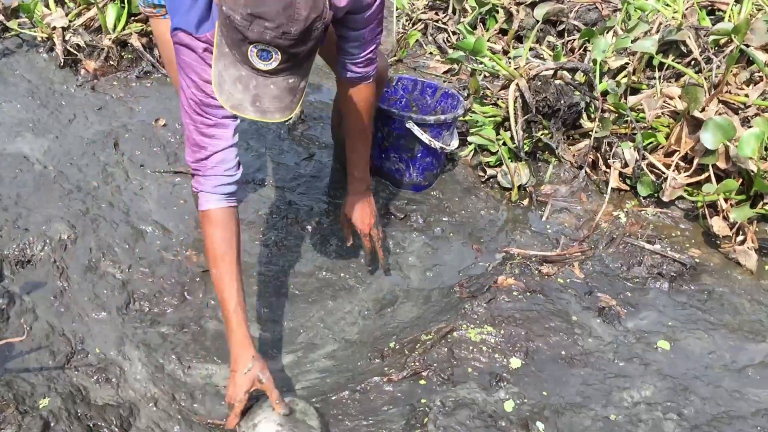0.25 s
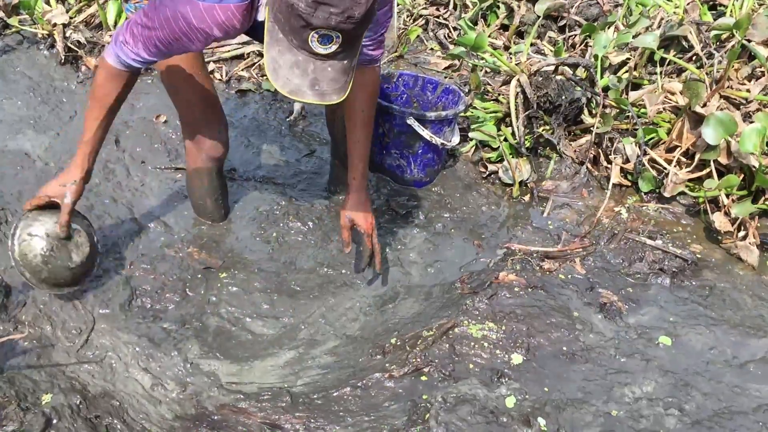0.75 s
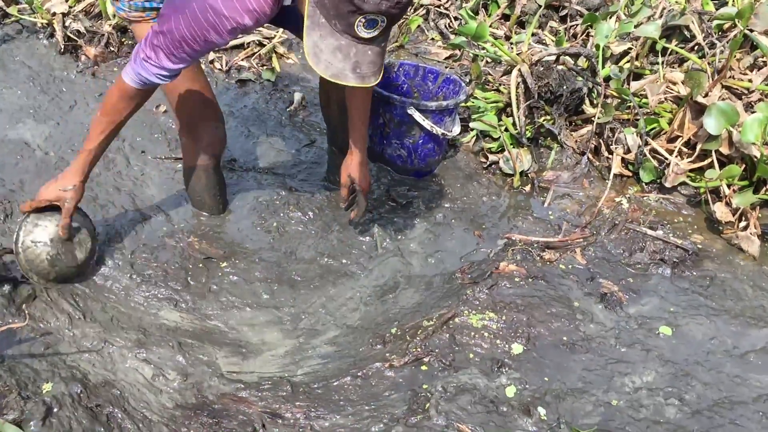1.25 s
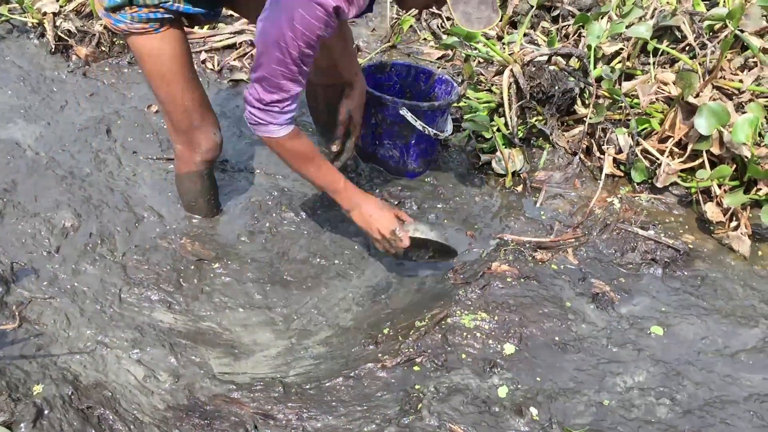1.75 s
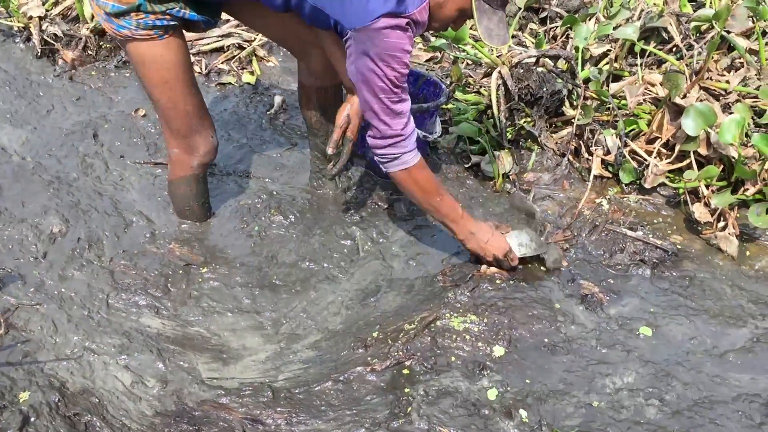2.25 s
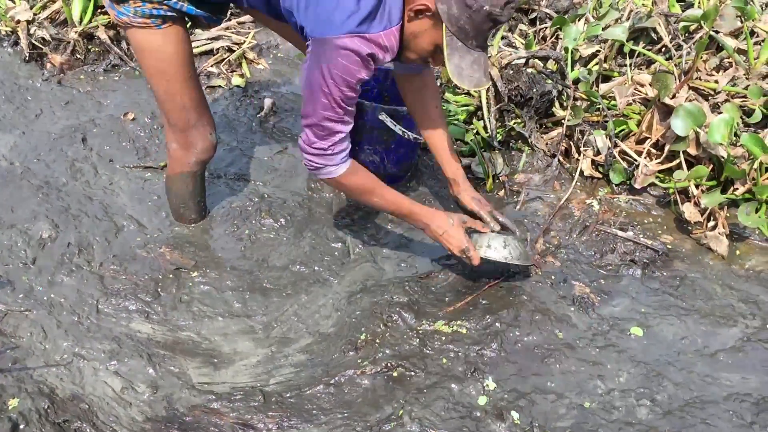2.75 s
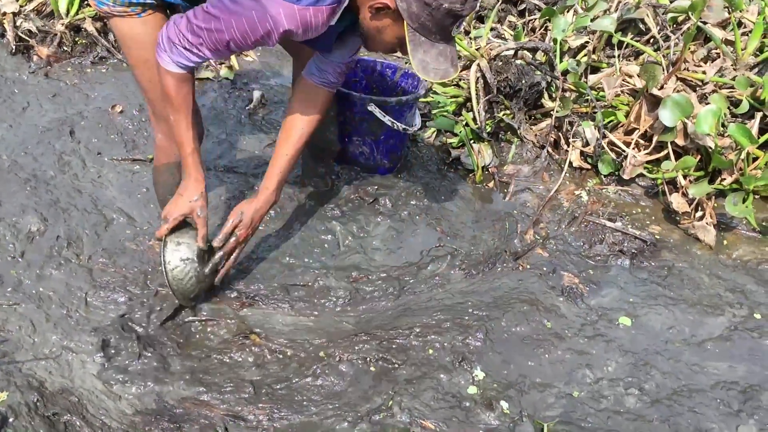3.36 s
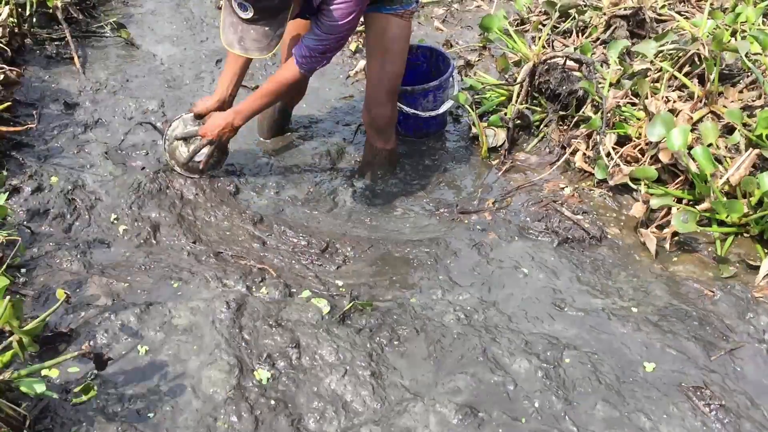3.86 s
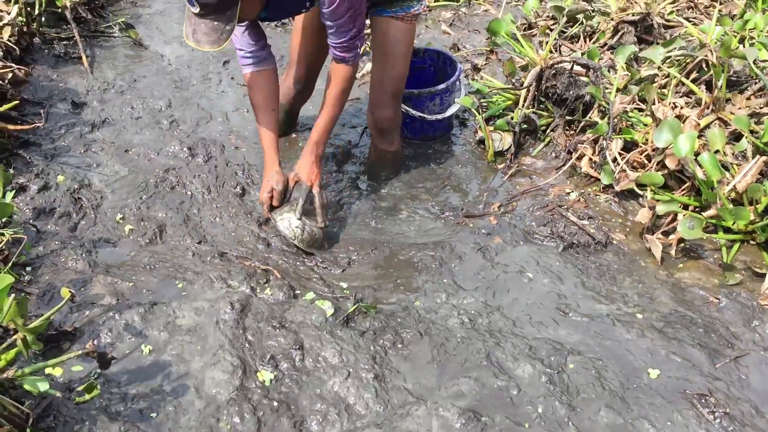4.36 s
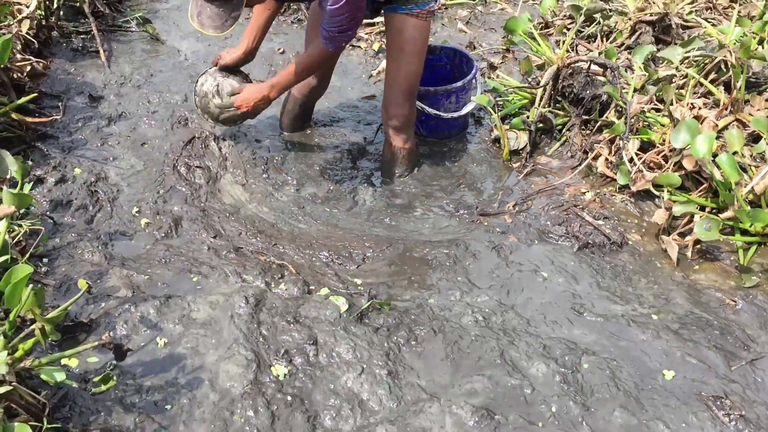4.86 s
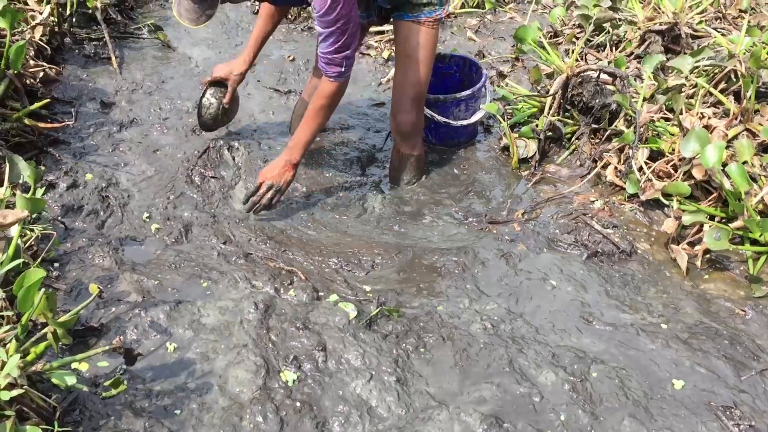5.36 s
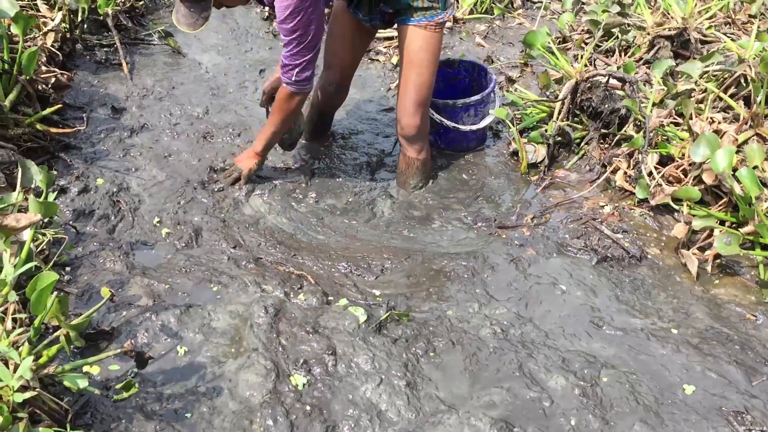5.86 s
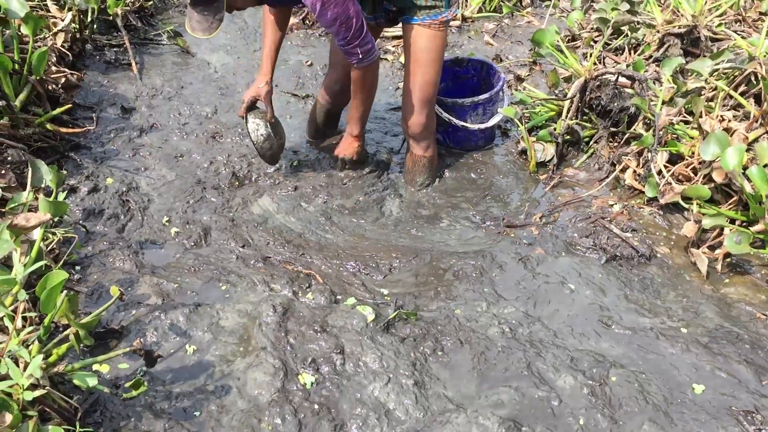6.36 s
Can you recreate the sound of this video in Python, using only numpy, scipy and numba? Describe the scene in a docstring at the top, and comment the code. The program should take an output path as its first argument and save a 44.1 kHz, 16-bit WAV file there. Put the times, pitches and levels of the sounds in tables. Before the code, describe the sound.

A hand and a metal bowl scoop through shallow muddy water a couple of metres away in the open. Short, irregular splashes come one after another, with wet slaps, fine spray and small rising bubbles, then thin out after one sharp slap near the end. Wind rumbles and thumps softly on the microphone, mostly at the start. Small birds chirp faintly in the distance over a soft hiss.

```python
"""Scooping shallow muddy water

A hand and a metal bowl scoop through the water, a couple of metres away in the open.
Trapped air rings as short rising bubbles; thrown water slaps and sprays. Wind buffets the microphone
and small birds call from the reeds over a faint field hiss. The sound drops out once for a moment."""
import sys
import numpy as np
from scipy import signal
from scipy.fft import rfft, irfft
from scipy.io import wavfile
from scipy.ndimage import uniform_filter1d
from numba import njit

SR = 44100
rng = np.random.default_rng(int(sys.argv[2]) if len(sys.argv) > 2 else 0)


def persist_wave(psi):
    """Save psi, clipped to +-1, as 16-bit WAV."""
    counts = np.round(np.clip(psi, -1, 1) * 32767).astype(np.int16)
    wavfile.write(sys.argv[1], SR, np.atleast_2d(counts).T)


N = 291501
TIME = np.arange(N) / SR


def undb(db):
    return 10 ** (np.asarray(db) / 20)


def level(x, db):
    """Sets the RMS level."""
    return x * undb(db) / np.sqrt(np.mean(x ** 2))


def band(x, lo_hz, hi_hz, order=2):
    """Butterworth band-pass."""
    sos = signal.butter(order, [lo_hz, min(hi_hz, .45 * SR)], "band", fs=SR, output="sos")
    return signal.sosfilt(sos, x)


def colour(x, eq):
    """EQ through (freq_hz, gain_db) points."""
    hz, db = np.transpose(eq)
    bin_hz = np.arange(N // 2 + 1) * SR / N + 1
    return irfft(rfft(x) * undb(np.interp(np.log(bin_hz), np.log(hz), db)), N)


def wander(rate_hz):
    """Smooth random modulation with a spread near 1."""
    hold = int(SR / rate_hz)
    steps = np.repeat(rng.standard_normal(N // hold + 1), hold)
    return 1.3 * uniform_filter1d(uniform_filter1d(steps, hold), hold)[:N]


def fader_db(points):
    """Level ride through (time_s, level_db) points, silent outside them."""
    time_s, db = np.transpose(points)
    return np.interp(TIME, time_s, db, left=-120, right=-120)


def echo(x, t60_s):
    """Diffuse reverb tail of unit energy, wet only."""
    t = TIME[:int(t60_s * SR)]
    tail = rng.standard_normal(SR)[:len(t)] * 1000 ** (-t / t60_s)
    return signal.fftconvolve(x, tail / np.sqrt(np.sum(tail ** 2)))[:N]


@njit
def ring(start_s, hz, peak, rise_s, t60_s, octaves_per_s):
    """Gliding sines that each swell, pass through hz at their peak and die away."""
    out = np.zeros(N)
    for e in range(len(start_s)):
        start, phase = int(start_s[e] * SR), 0.
        for i in range(min(int((rise_s[e] + t60_s[e]) * SR), N - start)):
            t = i / SR - rise_s[e]
            phase += 2 * np.pi * min(hz[e] * 2 ** (octaves_per_s[e] * t), .45 * SR) / SR
            envelope = np.sin(.5 * np.pi * i / SR / rise_s[e]) if t < 0 else 1000 ** (-t / t60_s[e])
            out[start + i] += peak[e] * envelope * np.sin(phase)
    return out


def swarm(count, lo_hz, hi_hz, cycles, spread_db, glide_oct):
    """A cloud of short random rings at unit RMS: many quiet, a few loud."""
    when, pitch, size, length = rng.random((count, 4)).T
    hz = lo_hz * (hi_hz / lo_hz) ** pitch
    t60_s = cycles * (.66 + length) / hz
    peak = undb(-spread_db * np.log(1 - .99 * size))
    return level(ring(when * TIME[-1], hz, peak, .82 / hz, t60_s, glide_oct / t60_s), 0)


# Tone of the background bed: freq_hz, gain_db
FIELD_EQ = [(150, -18), (300, -7), (500, -3), (1000, -0.5), (2500, -9), (4500, -16), (5500, -12),
            (9000, -17), (16500, -20)]


def field():
    """Distant hiss of leaves and far birds, drifting gently in level."""
    return level(colour(rng.standard_normal(N), FIELD_EQ), -66) * undb(wander(1.775))


# Assorted bird notes: start_s, length_s, from_hz, to_hz, level_db
BIRD_NOTES = [(.312, .25, 4270, 4480, -71), (0.114, 0.082, 2970, 2700, -63), (0.797, .14, 4330, 4310, -65),
              (1.113, 0.11, 2900, 2710, -66), (1.339, 0.039, 2770, 2775, -60),
              (1.826, .064, 2780, 2730, -61), (2.09, 0.048, 2770, 2790, -67),
              (4.182, 0.094, 3220, 2930, -66.5), (4.356, 0.095, 3470, 4320, -65.5),
              (4.415, 0.066, 1880, 1794, -51), (4.463, 0.062, 4070, 5080, -62.5),
              (4.93, 0.057, 2710, 2620, -58.5), (4.976, .072, 5150, 5240, -60),
              (5.008, .046, 2105, 1780, -60), (5.021, 0.05, 4830, 4000, -61),
              (5.24, 0.069, 2430, 2285, -61), (5.251, 0.059, 4700, 4320, -62),
              (5.269, 0.15, 1786, 1928, -61), (5.427, 0.125, 1750, 1595, -66),
              (5.473, .078, 2596, 2425, -65), (5.772, 0.064, 3480, 2980, -59),
              (6.082, 0.057, 2555, 2427, -57), (6.171, 0.039, 2080, 1830, -53.5),
              (6.208, 0.056, 5430, 4150, -62.5), (6.39, 0.033, 3800, 3250, -60),
              (6.438, 0.06, 3620, 3670, -62.5), (6.496, 0.115, 680, 791, -57)]
# One bird's repeated falling chirp: start_s, level_db
CHIRPS = [(.213, -59.5), (1.005, -55), (1.867, -53.5), (2.326, -54), (2.884, -55)]
CHIRP_S, CHIRP_FROM_HZ, CHIRP_TO_HZ = .0388, 4200, 3380
# Level ride of the far flock: time_s, level_db
CHATTER_RIDE = [(0, -67), (4, -74.5), (4.4, -62), (5.1, -68.5), (5.5, -59.5), (5.65, -67.5), (5.85, -62.5),
                (6.1, -82), (6.45, -67), (6.61, -71)]


def birds():
    """Wavering whistles that bend most at the start, heard largely through echoes off the reeds."""
    notes = np.zeros(N)
    waver = 1 + .022 * wander(70)
    chirps = [(start_s, CHIRP_S, CHIRP_FROM_HZ, CHIRP_TO_HZ, db) for start_s, db in CHIRPS]
    for start_s, length_s, from_hz, to_hz, db in BIRD_NOTES + chirps:
        start = int(start_s * SR)
        progress = np.arange(min(int(length_s * SR), N - start)) / (length_s * SR)
        span = slice(start, start + len(progress))
        hz = (to_hz + (from_hz - to_hz) * (1 - progress) ** 1.9) * waver[span]
        envelope = undb(db) * np.sin(np.pi * progress) ** .5
        notes[span] += envelope * np.sin(2 * np.pi * np.cumsum(hz) / SR)
    chatter = swarm(count=700, lo_hz=1600, hi_hz=5000, cycles=130, spread_db=2.5, glide_oct=-.4)
    chatter *= undb(fader_db(CHATTER_RIDE))
    notes *= undb(3.5 * wander(110))  # burred and broken
    far = echo(notes + chatter, t60_s=.37) * undb(2 * wander(40))  # the reeds sway
    return notes + undb(3) * far


# Level ride of the rumble: time_s, level_db
WIND_RIDE = [(0, -51), (.8, -46.5), (1, -57), (1.7, -52.5), (2, -57), (3, -57), (4.3, -56.5), (4.6, -53),
             (4.8, -55.5), (5, -55), (5.4, -56.5), (6.1, -53), (6.61, -55.5)]
# Single eddies that punch through it: start_s, pitch_hz, peak_db
THUMPS = [(.005, 97, -38), (.037, 90, -29), (.06, 104, -35.5), (0.11, 113, -39.5), (.159, 99, -40),
          (0.219, 77, -30.5), (0.299, 89.5, -37.5), (0.37, 126, -30.5), (.426, 140, -42), (.462, 93, -31),
          (0.572, 105, -37), (0.615, 73.5, -44), (0.686, 112, -36), (0.732, 71.5, -38.5), (0.804, 130, -29),
          (.983, 101, -42), (1.042, 80, -36.5), (1.123, 82, -41), (1.198, 61.6, -44.5), (1.308, 93, -38.5),
          (1.634, 72, -38), (1.686, 64, -42), (2.154, 85, -39), (2.798, 99.4, -43), (3.042, 83, -44.5),
          (4.566, 73, -41.5), (4.934, 71.6, -38), (4.99, 65, -39.5), (5.829, 86.4, -42), (5.875, 77, -45.5),
          (6.021, 93, -43), (6.198, 92, -41.5)]


def wind():
    """Eddies buffet the microphone: a puffing rumble, and sagging thumps with a short, higher edge."""
    puffs = undb(3.9 * wander(22)) * rng.standard_normal(N)
    rumble = level(band(puffs, 40, 119.6, order=3), 0) + level(band(puffs, 120, 276), -10.5)
    start_s, hz, db = np.transpose(THUMPS)
    rise_s = .86 / hz
    falling = np.full(len(hz), -1.)
    thumps = ring(start_s, hz, undb(db), rise_s, t60_s=6 / hz, octaves_per_s=25 * falling)
    edges = ring(start_s + rise_s / 2, 2.25 * hz, undb(db - 11),
                 rise_s=.42 / hz, t60_s=2.8 / hz, octaves_per_s=30 * falling)
    return undb(fader_db(WIND_RIDE)) * rumble + thumps + edges


def drips():
    """Stray drops: faint, high pings."""
    return undb(-76.5) * swarm(count=70, lo_hz=4500, hi_hz=12000, cycles=28, spread_db=3, glide_oct=.2)


# Fizz level rides, one list per splash: time_s, level_db
SPLASH_RIDES = [
    [(0, -51), (.048, -77), (.14, -65)],
    [(.299, -80), (.378, -52.5), (.498, -50.5), (.555, -42.5), (.797, -53.5), (.88, -64)],
    [(1.189, -80), (1.246, -46), (1.305, -58.5), (1.345, -57), (1.37, -73)],
    [(1.41, -62), (1.447, -58), (1.59, -55), (1.659, -66.5)],
    [(2.139, -79), (2.165, -54), (2.216, -70), (2.267, -50), (2.317, -72), (2.396, -48.5), (2.488, -46.5),
     (2.704, -54), (2.8, -76.5)],
    [(3.039, -68), (3.079, -51.5), (3.197, -53), (3.277, -46), (3.448, -47.5), (3.471, -40), (3.572, -62),
     (3.601, -47), (3.645, -68.5), (3.685, -63)],
    [(3.735, -51), (3.865, -43.5), (3.973, -59), (3.993, -63.5), (4.033, -44), (4.063, -59), (4.17, -64.5)],
    [(4.47, -63), (4.563, -61), (4.649, -60), (4.735, -46.5), (4.808, -62.5), (4.876, -62.5),
     (4.913, -48.5), (4.97, -73)],
    [(5.119, -79), (5.152, -64), (5.259, -77)],
    [(5.559, -57), (5.587, -37.5), (5.629, -62)],
    [(5.999, -93), (6.027, -50), (6.049, -71)],
]
# Layer trims against the fizz, one row per splash: spray_db, gurgle_db
SPLASH_MIX = [(-9, 10.5), (-8, 0.5), (-7.5, 11), (-5.5, -12), (-7, -3.5), (-9.5, -2), (-10.5, -3),
              (-11, 4.5), (-3.5, -8), (-13, -1), (-9.5, -15)]
# Tone of the fizz: freq_hz, gain_db
FIZZ_EQ = [(500, 2.5), (1000, -12), (2000, -4), (4000, 0), (7000, -9), (11000, -46)]
GURGLE_PIVOT_DB, GURGLE_SLOPE = -49, 1.5  # harder stirring lifts the gurgle faster than the fizz


def stirring():
    """Churned water: small bubbles fizz and droplets spray in shared patches, over low gurgles."""
    rides_db = np.array([fader_db(splash) for splash in SPLASH_RIDES])
    spray_trim_db, gurgle_trim_db = np.transpose(SPLASH_MIX)[..., None]
    fizz_db = rides_db.max(axis=0)
    spray_db = (rides_db + spray_trim_db).max(axis=0)
    expanded_db = GURGLE_PIVOT_DB + GURGLE_SLOPE * (rides_db - GURGLE_PIVOT_DB)
    gurgle_db = (expanded_db + gurgle_trim_db).max(axis=0)
    patches = undb(3 * wander(70))
    fizz = swarm(count=5000, lo_hz=1000, hi_hz=8000, cycles=28, spread_db=3.5, glide_oct=.3)
    fizz = undb(fizz_db) * level(colour(fizz + .3 * rng.standard_normal(N), FIZZ_EQ), 0)
    spray = swarm(count=5000, lo_hz=6000, hi_hz=16000, cycles=10, spread_db=4, glide_oct=.1)
    spray += .83 * level(band(rng.standard_normal(N), 4000, 17300), 0)
    gurgle = swarm(count=1300, lo_hz=492, hi_hz=1966, cycles=32, spread_db=3.5, glide_oct=.87)
    gurgle = undb(gurgle_db - 6.5) * band(gurgle, 380, 4000)
    spray *= undb(spray_db + 2.1 * wander(160))
    return patches * (fizz + spray) + gurgle


# Slap hits: peak_s, top_db, body_vs_top_db, t60_ms
SLAPS = [(0.028, -43, -30, 26), (.456, -37, -20, 23), (0.554, -26, 1.5, 31), (0.615, -23.5, -23, 14),
         (0.6268, -43, 15.5, 21), (.6973, -30, -17, 14), (1.2453, -37.5, -10, 37.5), (1.328, -40, -18, 25),
         (1.4393, -31, -27, 11), (1.457, -41.5, 1, 11), (1.495, -37, -9, 27), (1.519, -41, -1.5, 8),
         (1.5535, -37, -15, 23), (1.5685, -32, -24, 17), (1.5954, -21.5, -1.5, 5.6),
         (1.609, -25.5, -33, 5.4), (1.6286, -34.5, 0, 15), (2.399, -36, 1, 13), (2.4614, -50, -6, 15),
         (2.48, -37, 1, 68), (2.4983, -46, -3, 30), (2.546, -43, 1, 96), (2.633, -39, -2, 33),
         (2.701, -44, 9, 5.6), (2.7274, -43, -27, 20), (3.029, -47, -31, 38), (3.0873, -37, 0, 21),
         (3.1283, -49, -22, 13), (3.143, -29.5, -5, 30), (3.2133, -43, -19, 18), (3.2248, -35, -17, 11),
         (3.2516, -34.5, -7, 29), (3.2985, -34, 1, 20), (3.41, -46.5, 8, 79), (3.4577, -30, -26, 11),
         (3.466, -42.5, 11.5, 84), (3.5937, -41, 2, 21), (3.736, -51.5, 5, 30), (3.8754, -36.5, 5, 29),
         (4.0375, -47, 3.5, 42.5), (4.4933, -37, -16, 5), (4.61, -35, -2.5, 16), (4.688, -35.5, -13, 32),
         (4.7336, -35.5, 4.5, 36), (4.8939, -36, -11, 6.9), (4.913, -37.5, 0.5, 27), (5.426, -44, -9, 5.8),
         (5.5784, -17.5, 0, 4.6), (5.579, -28.5, 4, 14.6), (5.594, -34, -8, 22), (5.8796, -41, -12, 12),
         (6.021, -59, 7, 6.5), (6.2463, -56, 12, 11), (6.4486, -57.5, 9.5, 12)]
SLAP_RISE_MS = .98  # per 10 dB of attack


def slaps():
    """Water hits water: fast noise bursts with a bright top and a duller body."""
    top, body = np.zeros(N), np.zeros(N)
    lead = SR // 50
    t_ms = 1000 * np.arange(-lead, SR // 10) / SR
    for peak_s, top_db, body_vs_top_db, t60_ms in SLAPS:
        envelope_db = np.where(t_ms < 0, 10 * t_ms / SLAP_RISE_MS, -60 * t_ms / t60_ms)
        start = int(peak_s * SR) - lead
        span = slice(start, start + len(t_ms))
        top[span] += undb(top_db + envelope_db)
        body[span] += undb(top_db + body_vs_top_db + envelope_db)
    droplets = rng.laplace(size=N) * rng.standard_normal(N) / np.sqrt(2)  # spiky: many separate drops
    return undb(-1.5) * band(top * droplets, 4150, 14400) + undb(6.5) * band(body * droplets, 1260, 6400)


# Gulp accents: start_s, pitch_at_peak_hz, peak_db, swell_ms
GULPS = [(0, 1570, -42.5, 6.7), (1.214, 1080, -44, 5.9), (1.226, 1300, -39, 4.2), (1.657, 1594, -46.5, 19),
         (2.145, 1430, -43, 18), (2.673, 1506, -43.5, 14.6)]


def gulps():
    """Cavities close slowly and sweep steeply upward in pitch."""
    start_s, hz, db, swell_ms = np.transpose(GULPS)
    each = np.ones(len(hz))
    return ring(start_s, hz, undb(db), swell_ms / 1000, t60_s=.063 * each, octaves_per_s=48.5 * each)


# Foreground bubbles: start_s, pitch_hz, peak_db, t60_ms
BUBBLES = [(.031, 3180, -40.5, 21), (0.424, 675, -30, 26), (0.4487, 2050, -29.5, 14), (0.532, 3880, -29, 3),
           (0.5514, 3700, -15, 5.5), (.5517, 658, -28.5, 59), (0.593, 1900, -31, 25), (.5991, 664, -27, 51),
           (0.614, 1660, -32, 20), (0.6264, 2410, -19.5, 8.2), (.654, 2170, -32.5, 37),
           (0.657, 4240, -32, 12), (.69, 1130, -39, 16), (.726, 1800, -28.5, 14), (0.7508, 1096, -36.5, 35),
           (.861, 3130, -38, 11), (0.9066, 6150, -37, 10), (1.0152, 4130, -38, 9.1),
           (1.248, 278, -38.5, 15), (1.2537, 656, -16.5, 13), (1.253, 1530, -23.5, 6.3),
           (1.321, 3760, -35.5, 17), (1.555, 4100, -28.5, 2.8), (1.5817, 2240, -20, 16),
           (1.6308, 3000, -24.5, 1.8), (1.833, 2280, -38, 8.1), (1.9189, 1250, -31, 19),
           (2.255, 1210, -43.5, 81), (2.39, 1203, -27, 31), (2.3885, 2130, -32.5, 30),
           (2.391, 4280, -33, 14), (2.4764, 644, -26.5, 26), (2.4799, 2600, -27.5, 14),
           (2.497, 3460, -27.5, 6.2), (2.5094, 4680, -32, 15), (2.571, 1240, -37.5, 20),
           (2.623, 5670, -28, 5.7), (2.6237, 1216, -38, 27), (2.659, 3450, -28.5, 1.6),
           (2.7004, 2060, -36, 13), (2.7667, 4760, -39, 6.6), (3.0632, 3520, -37, 11),
           (3.082, 1484, -34.5, 9.4), (3.1202, 3500, -34, 15), (3.145, 2470, -29, 14),
           (3.148, 1710, -27, 10), (3.231, 5050, -26.5, 6.3), (3.2511, 657, -33.5, 24),
           (3.2673, 1444, -15, 13), (3.2732, 1460, -26, 5.8), (3.283, 1490, -19.5, 14),
           (3.349, 5700, -34.5, 7.7), (3.4068, 2800, -27.5, 5), (3.4678, 1080, -26.5, 5.6),
           (3.4776, 2380, -23, 9), (3.4826, 805, -33.5, 40), (3.491, 1710, -28.5, 23),
           (3.594, 3370, -37.5, 15), (3.5982, 1360, -27, 17), (3.794, 1270, -32.5, 10),
           (3.8289, 2290, -31, 21), (3.8607, 713, -29, 17), (3.8638, 1840, -32, 25),
           (3.8732, 813, -25.5, 30), (3.9012, 1050, -34.5, 16), (3.952, 2000, -39, 15),
           (4.0209, 2000, -31.5, 36), (4.023, 4070, -35.5, 17), (4.0239, 900, -25.5, 15),
           (4.0338, 2130, -33, 4.3), (4.139, 1350, -48, 65), (4.609, 3880, -33, 14),
           (4.6873, 1300, -24.5, 1.7), (4.7097, 950, -30, 35), (4.7337, 600, -31, 7.3),
           (4.7348, 263, -30, 36), (4.817, 1370, -41, 13), (4.9023, 3320, -26.5, 2.4),
           (4.9118, 1075, -31, 24), (5.4245, 6800, -41.5, 10), (5.546, 3440, -38.5, 17),
           (5.578, 1870, -30, 33), (5.5778, 3640, -21, 17), (5.7367, 2400, -28, 0.8),
           (5.777, 4220, -44, 11), (6.198, 5700, -42.5, 17), (6.368, 1770, -32.5, 10)]
BUBBLE_RISE_CYCLES, BUBBLE_GLIDE_OCT = 1.5, .18


def bubbles():
    """Larger air pockets ring one by one, rising in pitch as they near the surface."""
    start_s, hz, db, t60_ms = np.transpose(BUBBLES)
    t60_s = np.maximum(t60_ms, 1) / 1000
    return ring(start_s, hz, undb(db), BUBBLE_RISE_CYCLES / hz, t60_s, BUBBLE_GLIDE_OCT / t60_s)


def scene():
    """Mono mix: the water up front, with wind, birds and the field bed around it."""
    water = drips() + bubbles() + gulps() + slaps() + stirring()
    water += undb(-11) * echo(water, t60_s=.06)  # mud banks and ripples scatter a short tail
    return (water + wind() + birds() + field())[None]


DIP_HZ, DIP_WIDTH_HZ, DIP_DB = 10300, 850, -4.5
DROPOUT_FROM_S, DROPOUT_TO_S = 3.6856, 3.7332
HIGH_CUT_HZ = 16100


def record(dry):
    """A shallow dip in the microphone's treble, one short silence, then a steep high cut."""
    dip_band = band(dry, DIP_HZ - DIP_WIDTH_HZ / 2, DIP_HZ + DIP_WIDTH_HZ / 2, order=1)
    dipped = dry - (1 - undb(DIP_DB)) * dip_band
    gate = (TIME < DROPOUT_FROM_S) | (TIME > DROPOUT_TO_S)
    high_cut = signal.ellip(10, .2, 70, HIGH_CUT_HZ, fs=SR, output="sos")
    return signal.sosfilt(high_cut, dipped * gate)


dry = scene()
out = record(dry)
persist_wave(out)
```